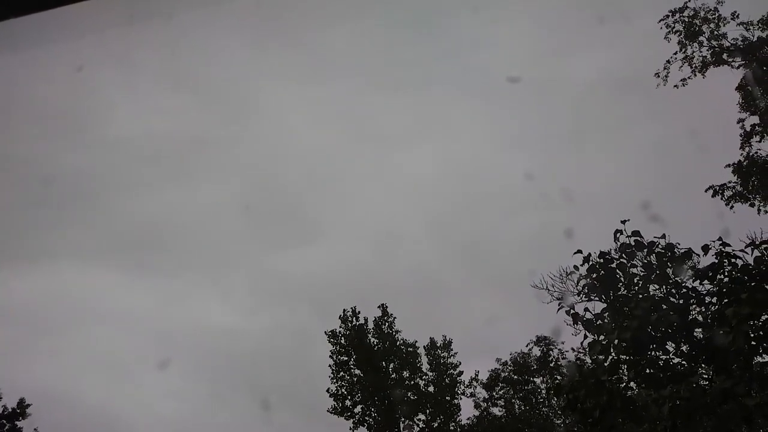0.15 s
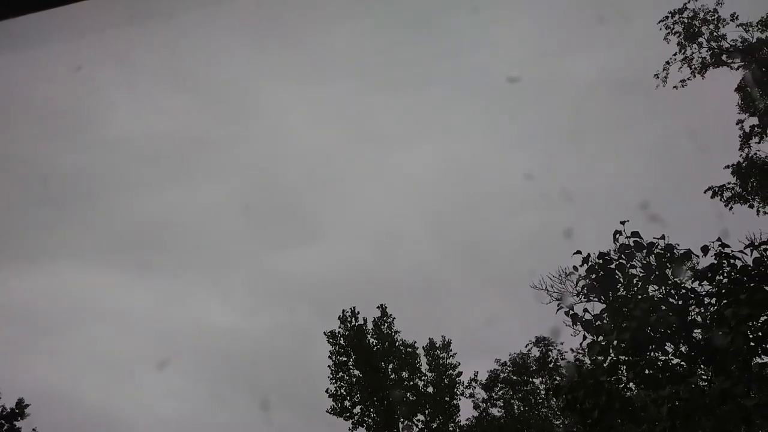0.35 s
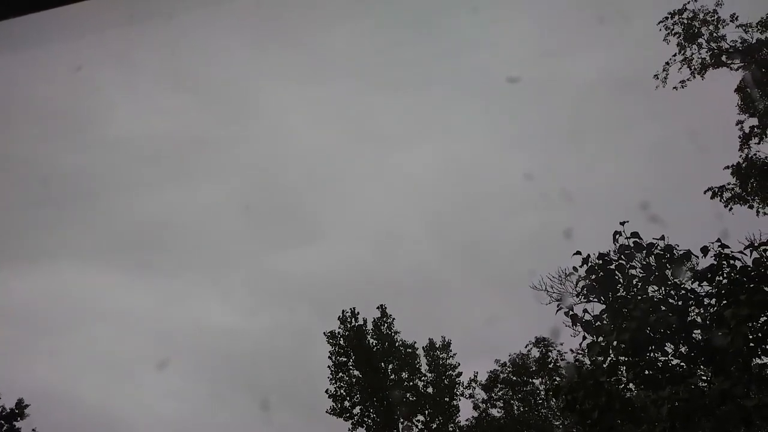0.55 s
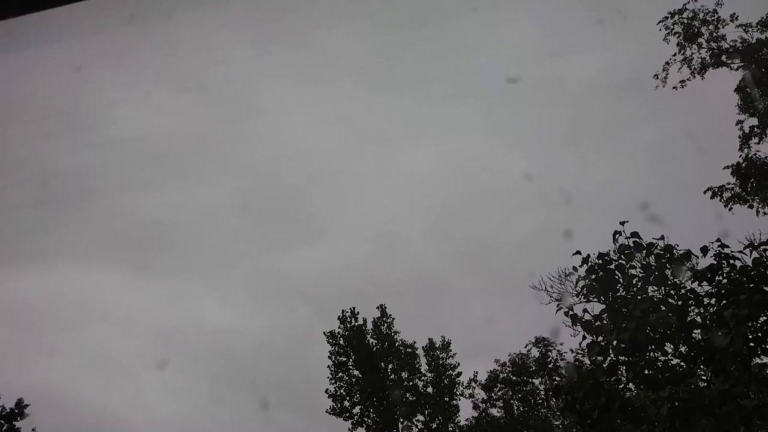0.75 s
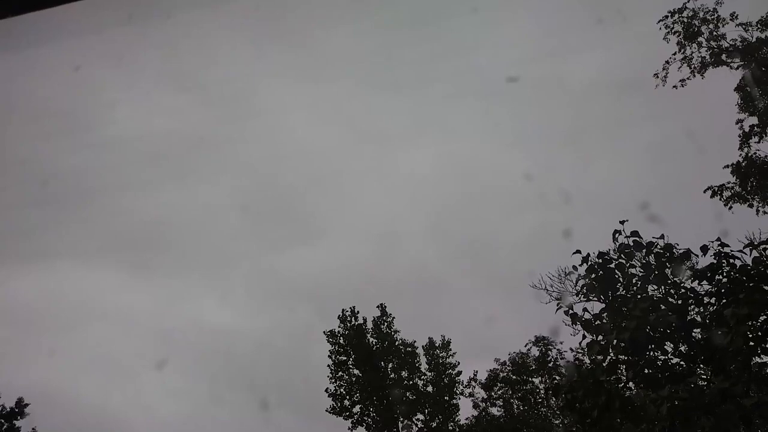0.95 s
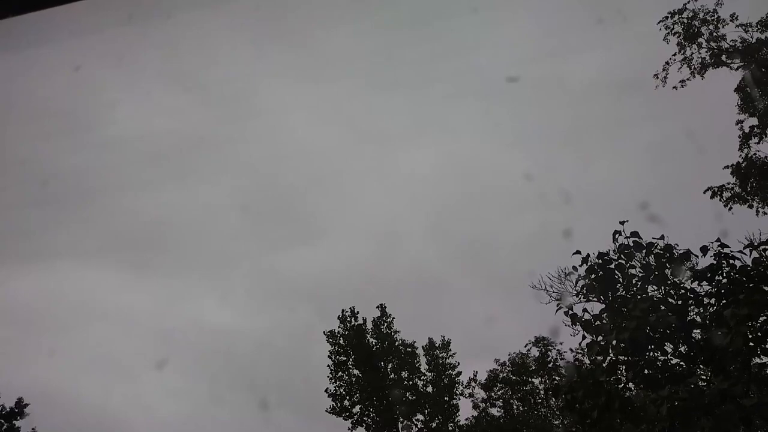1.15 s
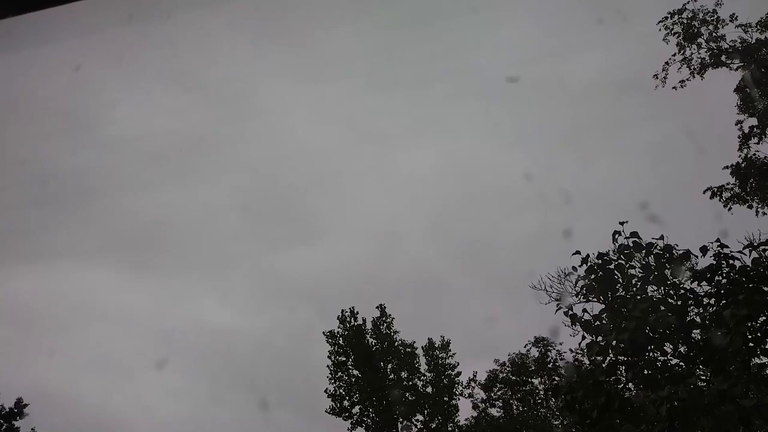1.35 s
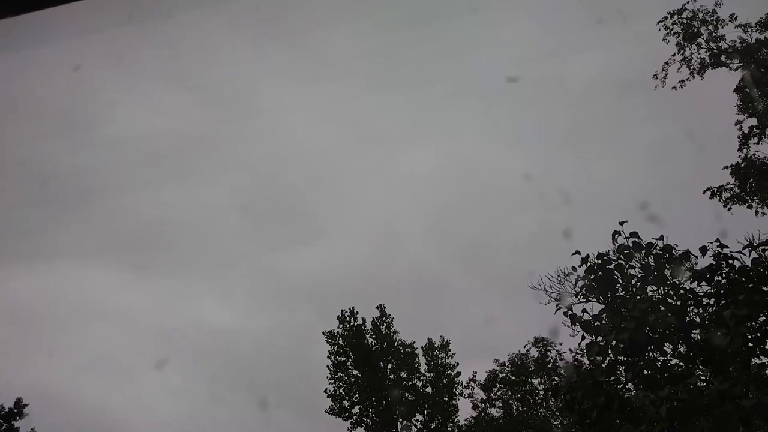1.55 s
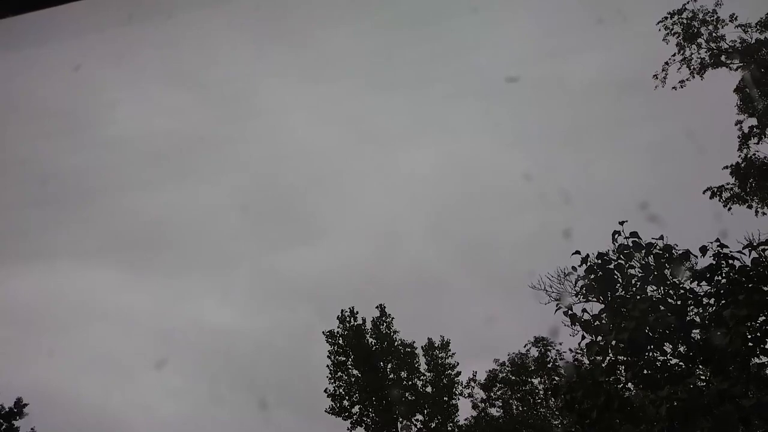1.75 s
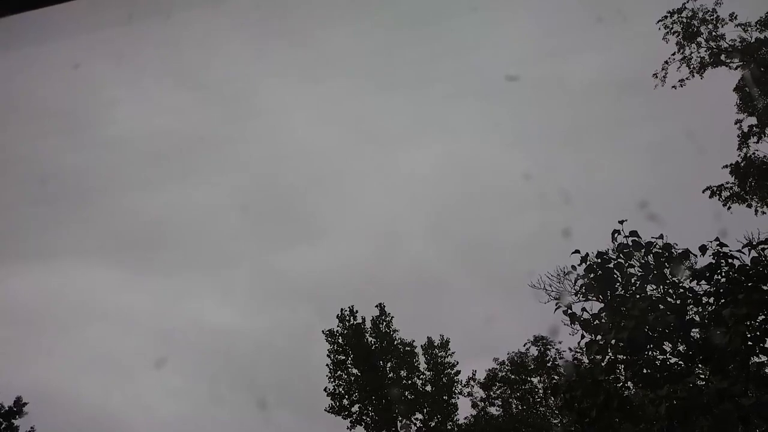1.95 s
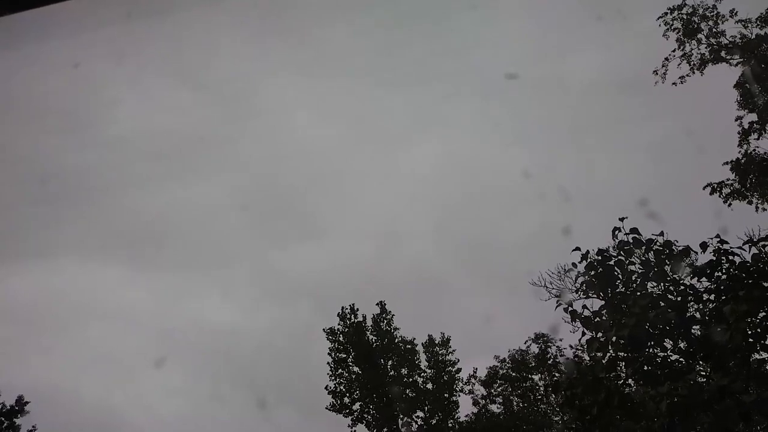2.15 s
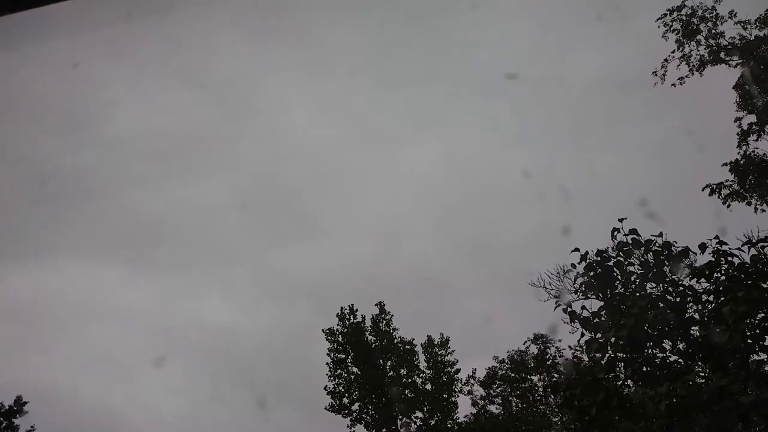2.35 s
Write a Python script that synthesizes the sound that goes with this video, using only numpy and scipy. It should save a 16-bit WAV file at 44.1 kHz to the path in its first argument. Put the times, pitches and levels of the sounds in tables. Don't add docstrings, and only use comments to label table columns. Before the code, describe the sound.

Under a grey sky in a leafy garden, loud thunder rumbles and surges several times, then weakens, leaving soft rain hiss and near drops ticking on leaves; wide stereo pickup with slight outdoor echoes.

```python
import sys
import numpy as np
from scipy import signal
from scipy.fft import rfft, irfft
from scipy.io import wavfile
from scipy.ndimage import uniform_filter1d, minimum_filter1d

SR = 44100
rng = np.random.default_rng(int(sys.argv[2]) if len(sys.argv) > 2 else 0)


def field_ratio(decibels):
    return 10 ** (np.asarray(decibels, dtype=float) / 20)


def digitize_waveform(pressure):
    field = np.atleast_2d(pressure).T
    bounded = np.clip(field, -1, 1)
    quanta = np.round(bounded * 32767).astype(np.int16)
    wavfile.write(sys.argv[1], SR, quanta)


N = 110250
MEAN_LAG_S = 0.00027


def in_time(rows):
    s, *columns = np.transpose(rows)
    return [np.interp(np.arange(N) / SR, s, column) for column in columns]


def at_hz(points, hz):
    point_hz, point_db = np.array(points).T
    return np.interp(np.log(hz + 1), np.log(point_hz), point_db)


def rms_one(x):
    return x / np.sqrt(np.mean(x ** 2) + 1e-20)


def drift(rate_hz):
    step = 40
    r = np.exp(-2 * np.pi * step * rate_hz / SR)
    noise = rng.standard_normal(N // step + 2002)
    slow = signal.lfilter([1], [1, -2 * r, r * r], noise)[2000:]
    return np.interp(np.arange(N) / step, np.arange(len(slow)), rms_one(slow))


def colour(x, spectrum):
    hz = np.fft.rfftfreq(N, 1 / SR)
    inside = (hz > spectrum[0][0]) & (hz < spectrum[-1][0])
    return irfft(rfft(x) * field_ratio(at_hz(spectrum, hz)) * inside, N)


def lagged(spec, lag_s, size):
    turn = np.exp(-1j * np.pi * np.fft.rfftfreq(size, 1 / SR) * lag_s)
    return np.array([spec * turn, spec / turn])


# (frequency [Hz], level [dB])
RAIN_COLOUR = [(900, 0), (2000, -3.5), (3500, -4), (6600, -10), (7400, -10.5), (8700, -13.5),
               (13300, -15.5), (14500, -24)]


def rain():
    level_db, fade_db_per_s, pan_db = -62, -2, 1.5
    likeness = 0.17
    ticks = rng.standard_normal((2, N)) * field_ratio(1.4 * rng.exponential(1, (2, N)))
    mid, side = colour(ticks, RAIN_COLOUR)
    hiss = rms_one(np.sqrt(1 + likeness) * mid + np.sqrt(1 - likeness) * side * [[1], [-1]])
    fade_db = fade_db_per_s * (np.arange(N) / SR - 1.25) + 0.6 * drift(10)
    return field_ratio(level_db + fade_db + pan_db * np.array([[.5], [-.5]])) * hiss


# (time [s], peak level [dB], left over right [dB], time to fade by 60 dB [s], spray over knock [dB])
FIRST_DROPS = [
    (.006, -49, 0, .07, -10),
    (.027, -54, 0, .1, -7),
]
LATER_DROPS = [
    (0.2252, -58.5, -2, 0.12, 2),
    (1.733, -46.5, -0.5, 0.14, -9.5),
    (1.931, -53.5, 2, 0.12, -4.5),
    (2.2438, -40, 2.5, 0.13, -13.5),
    (2.308, -50.5, 3, 0.074, -14),
    (2.465, -49, 1, 0.086, -15),
]
# (frequency [Hz], level [dB per Hz])
KNOCK_COLOUR = [(800, -20.5), (1300, -5), (1900, -5), (2800, -15.5)]
# (frequency [Hz], level [dB per Hz])
SPRAY_COLOUR = [(2200, -5), (3000, 7), (5500, 6), (7500, -11), (13500, -8.5)]


def drops():
    gain_db, rise_s = -2.5, 0.00027
    tick_db, tick_t60_s = 1.5, .02
    t, out = np.arange(N) / SR, 0
    knock = rms_one(colour(rng.standard_normal((2, N)), KNOCK_COLOUR))
    spray = rms_one(colour(rng.standard_normal((2, N)), SPRAY_COLOUR))
    for s, level_db, pan_db, t60_s, spray_db in FIRST_DROPS + LATER_DROPS:
        age = np.maximum(t - s, 0)
        sides_db = np.array([[pan_db], [-pan_db]]) / 2
        envelope = field_ratio(level_db + gain_db + sides_db - 60 * age / t60_s) * (1 - np.exp(-age / rise_s))
        tick = 1 + field_ratio(tick_db - 60 * age / tick_t60_s)
        out = out + envelope * (knock + field_ratio(spray_db) * tick * spray)
    return out


# (time [s], length [s], level [dB], centre frequency [Hz])
TWIGS = [(.14, 0.042, -41.5, 690), (0.28, 0.024, -33, 480), (.53, .05, -44.5, 1050),
         (1.06, 0.027, -43.5, 800), (1.31, 0.11, -57, 1740), (.49, 0.088, -40.5, 880),
         (1.635, 0.1, -31, 700), (.36, .1, -41.5, 1000), (1.5, 0.085, -51, 1300),
         (2.162, 0.046, -34.5, 576), (2.3, 0.02, -46, 840), (1, 0.13, -34.5, 560),
         (0.44, 0.054, -38.5, 750), (0.81, 0.038, -28.5, 360)]


def cracks():
    width = 1.275
    t, out = np.arange(N) / SR, 0
    shocks = rng.standard_normal((2, N)) * field_ratio(0.93 * rng.exponential(1, (2, N)))
    for s, length_s, level_db, hz in TWIGS:
        band = signal.butter(3, [hz / width, hz * width], "band", fs=SR, output="sos")
        share = np.clip((t - s) / (1.37 * length_s), 0, 1)
        swell = np.sin(np.pi * share ** .5)
        out = out + field_ratio(level_db + 0.5) * swell * rms_one(signal.sosfilt(band, shocks))
    return out


# (time [s], peak level [dB], ring frequency [Hz])
KINKS = [(0.146, -23.5, 431), (0.282, -26.5, 401), (0.344, -20.5, 428), (0.369, -17.5, 549),
         (0.408, -21.5, 409), (0.509, -20, 484), (0.647, -23, 447), (0.782, -23.5, 436),
         (0.859, -20.5, 406), (0.973, -17.5, 536), (1.157, -21, 431), (1.18, -23.5, 401),
         (1.266, -27.5, 522), (1.311, -27.5, 471), (1.34, -27.5, 471), (1.432, -22.5, 444),
         (1.527, -23.5, 460), (1.56, -28, 441), (1.622, -18.5, 428), (2.161, -21.5, 409),
         (2.212, -21.5, 506), (2.307, -29, 474)]


def kinks():
    gain_db, lag_spread_s = -4.5, 0.00019
    cycles = 8.6
    t, out = np.arange(N) / SR, 0
    for (s, level_db, hz), way in zip(KINKS, rng.standard_normal((len(KINKS), 1))):
        delay = (MEAN_LAG_S + lag_spread_s * way) * np.array([[.5], [-.5]])
        age = np.maximum(t - s - delay, 0)
        rise = 1 - np.exp(-3 * hz * age)
        fall = field_ratio(level_db + gain_db - 60 * age * hz / cycles)
        out = out + fall * np.sin(2 * np.pi * hz * age) * rise
    return out


# (time [s], length [s], level [dB], shock rate [Hz])
BOOMS = [(.36, 0.11, -18.5, 108), (.37, 0.082, -23.5, 60), (.44, .05, -19.5, 105.7),
         (.715, .04, -21.5, 124), (.519, 0.19, -22.5, 108), (.664, 0.084, -14.5, 108),
         (.68, 0.16, -20.5, 66.6), (.855, 0.025, -15, 82), (.96, 0.087, -18, 71.1),
         (.97, 0.056, -16.5, 127.4), (1.08, 0.077, -16, 99.2), (1.092, 0.05, -14, 68.3),
         (1.15, 0.079, -17, 79.3), (1.29, 0.074, -24.5, 96.3), (1.33, 0.075, -21.5, 68.2),
         (1.589, 0.13, -12, 108), (1.6, 0.14, -22.5, 55.5), (1.75, 0.046, -27, 96.1),
         (1.96, 0.055, -20, 72), (2.35, 0.068, -28.5, 116.5)]
# (time [s], length [s], level [dB], shock rate [Hz])
CLAPS = [(.201, 0.1, -22.5, 267.6), (.344, .06, -18.5, 168.8), (.399, 0.061, -19, 276),
         (.664, 0.028, -16, 173.3), (.703, 0.044, -16, 181.5), (.8, 0.1, -23.5, 286.7),
         (.808, 0.04, -12, 175.5), (.85, 0.032, -10.5, 145.2), (1.013, 0.04, -25.5, 446),
         (1.028, .055, -14.5, 257.8), (1.04, .05, -13, 149), (1.09, .05, -16, 175.3),
         (1.112, 0.029, -16.5, 148.6), (1.205, 0.077, -25, 250.8), (1.429, .09, -26, 170),
         (1.59, .05, -30.5, 431), (1.594, 0.05, -16.5, 256.4), (1.65, .05, -15.5, 229.8),
         (1.706, 0.033, -13.5, 238.6), (1.76, 0.1, -33.5, 164.7), (1.826, 0.061, -25, 228),
         (2.162, 0.038, -17, 242.4), (2.203, 0.025, -18.5, 235), (2.18, 0.087, -28.5, 151.6),
         (.202, .07, -22.5, 350), (.42, .06, -29.5, 390.7), (1.68, .09, -22.5, 154), (2.165, .06, -34, 458),
         (1.43, 0.066, -29, 438), (.43, 0.049, -20, 171.8), (.885, 0.02, -18, 170),
         (.35, 0.053, -26.5, 370), (1.3, 0.065, -31, 339), (1.65, 0.0682, -33, 580)]


def runs(table):
    waver, uneven_db = .07, 2
    sharpness, edge = 0.16, 0.98
    cut_hz, lag_spread_s = 785, 0.00049
    size = SR // 2
    t, out = np.arange(size) / SR, np.zeros((2, N + SR))
    for (s, length_s, level_db, hz), draw in zip(table, rng.standard_normal((len(table), 16))):
        pace_draw, phase_draw, way, strength_draw = draw[:6], draw[6], draw[7], draw[8:]
        share = np.clip(t / (1.5 * length_s), 0, 1)
        wander = np.interp(share, np.linspace(0, 1, 6), pace_draw - pace_draw.mean())
        phase = 2 * np.pi * (np.cumsum(hz * (1 + waver * wander)) / SR + phase_draw)
        shape = sum(sharpness ** (k - 1) * np.sin(k * phase) for k in (1, 2, 3, 4))
        swell = np.sin(np.pi * share ** 0.47) ** edge * (share < 1)
        strength = np.interp(share, np.linspace(0, 1, 8), strength_draw - strength_draw.mean())
        run = np.sqrt(2) * field_ratio(level_db + uneven_db * strength) * swell * shape
        start = max(int((s - length_s / 30) * SR), 0)
        spec = lagged(rfft(run), MEAN_LAG_S + lag_spread_s * way, size)
        out[:, start:start + size] += irfft(spec, size)
    return signal.lfilter(*signal.butter(2, cut_hz, fs=SR), out[:, :N])


ECHO_DELAYS = (.031, .057, .094, .14)


def echoes(x):
    out = x.copy()
    for k, delay in enumerate((np.array(ECHO_DELAYS) * SR).astype(int)):
        out[:, delay:] += field_ratio(-14 - 2.0 * k) * np.roll(x, k + 1, axis=0)[:, :N - delay]
    return out


# (time [s], level [dB], depth: extra at 50 Hz [dB], nearness: extra at 2000 Hz [dB])
ROLL = [(0, -38.5, -4, 4.5), (.19, -40.5, 1.5, 6), (.3, -36, 4, -1), (.37, -30.5, -0.5, -1.5),
        (.52, -36, 2, 2), (.64, -36.5, -2.5, 1.5), (.87, -31, 1, 4.5), (.93, -32.5, -1.5, 2.5),
        (1.06, -29.5, -3, 4.5), (1.25, -37.5, -0.5, 4.5), (1.56, -36.5, 0, -5), (1.61, -27.5, -9, 2),
        (1.72, -32, -3, 2.5), (1.79, -35, 2, 3), (2.0, -44.5, -2, 8), (2.14, -41, 2.5, 1),
        (2.19, -36, -5.5, -1.5), (2.5, -48.5, 0, 11)]
# (frequency [Hz], level [dB per Hz])
RUMBLE_COLOUR = [(13, -44.5), (40, -9), (58, 1.5), (100, -3), (260, -10.5), (480, -17.5), (1000, -30.5),
                 (1900, -44.5), (2700, -68)]
# (frequency [Hz], width [Hz], lift [dB])
YARD = [(72, 4.1, 2), (108, 4.9, 12), (170, 3.8, 4.5), (249.8, 67, 8), (351.5, 5, 12), (461, 62, 3.5),
        (562, 7.9, 5.5), (720, 4.1, 7.5), (794, 22, 4)]


def rumble(patchy_db, flutter_db, count=12):
    level_db, shocks_per_s, shock_spread_db, lag_spread_s = -21, 2500, 1.5, 0.00052
    low_follows, high_follows = 1, 0.99
    shade_hz, shade_db = 940, -3
    size = N + 8192
    hz = np.fft.rfftfreq(size, 1 / SR)

    strength_db = shock_spread_db * np.minimum(rng.exponential(1, size), 5)
    strengths = field_ratio(strength_db) * rng.choice([-1, 1], size)
    shocks = strengths * (rng.random(size) < shocks_per_s / SR)
    way = rng.integers(0, count, size)
    lags = MEAN_LAG_S + lag_spread_s * np.linspace(-1, 1, count)
    spec = sum(lagged(rfft(shocks * (way == k)), lag, size) for k, lag in enumerate(lags))

    lift_db = sum(db / (1 + (2 * (hz - centre_hz) / width_hz) ** 2) for centre_hz, width_hz, db in YARD)
    spec = spec * field_ratio(at_hz(RUMBLE_COLOUR, hz) + lift_db) * (hz < RUMBLE_COLOUR[-1][0])
    spec[0] *= field_ratio(shade_db * np.exp(-np.log2(hz / shade_hz + 1e-9) ** 2 / 0.23))
    spec /= np.sqrt(np.mean(irfft(spec, size) ** 2))

    swing_db, depth_db, near_db = in_time(ROLL)
    swing_db = swing_db - swing_db.mean()
    together, out = drift(32), 0
    third_octave = np.clip(3 * np.log2(hz / 25 + 1e-9), 0, 21)
    for k in range(22):
        overlap = np.cos(np.pi / 2 * np.clip(third_octave - k, -1, 1)) ** 2
        band = irfft(spec * overlap, size)[:, :N]
        follows = low_follows + (high_follows - low_follows) * (k - 3) / 16
        band_db = follows * swing_db
        band_db = band_db + depth_db * max(1 - (k - 3) / 9, 0) + near_db * max((k - 13) / 6, 0)
        band_db = band_db + patchy_db * drift(4.4) + flutter_db * together
        out = out + band * field_ratio(band_db)
    return field_ratio(level_db) * out


def scene():
    roll = rumble(patchy_db=1.05, flutter_db=1.4)
    sudden = runs(BOOMS) + runs(CLAPS) + cracks() + kinks()
    return roll + echoes(sudden) + rain() + drops()


def low_pass(x):
    return signal.sosfilt(signal.butter(12, 14400, fs=SR, output="sos"), x)


def record(dry):
    fade_out_s, ceiling, look_ahead = .004, .95, 440
    hot = dry * field_ratio(np.array([[-.25], [.25]]))
    time_left = np.arange(N)[::-1] / SR
    hot = hot * np.sin(np.pi / 2 * np.clip(time_left / fade_out_s, 0, 1)) ** 2
    peak = np.maximum(np.abs(hot).max(axis=0), ceiling)
    room = minimum_filter1d(ceiling / peak, size=2 * look_ahead + 1)
    gain = uniform_filter1d(uniform_filter1d(room, size=look_ahead), size=look_ahead)
    return low_pass(hot * gain)


dry = scene()
out = record(dry)
digitize_waveform(out)
```